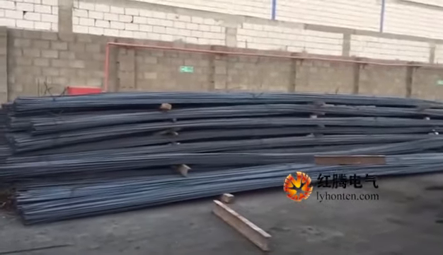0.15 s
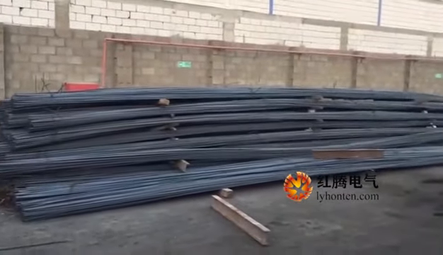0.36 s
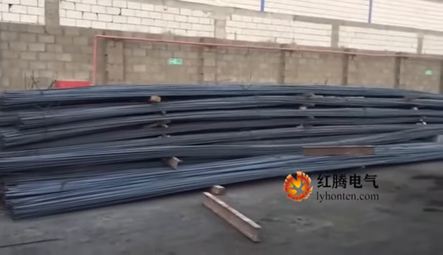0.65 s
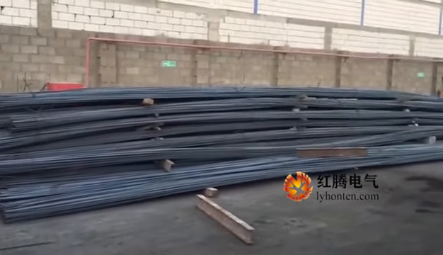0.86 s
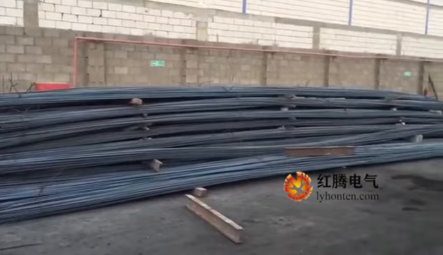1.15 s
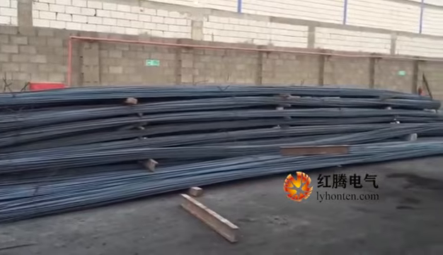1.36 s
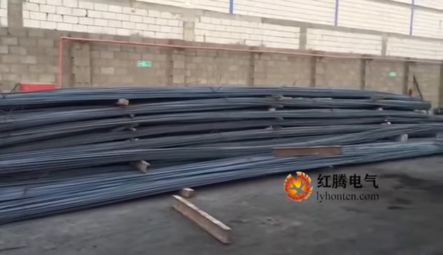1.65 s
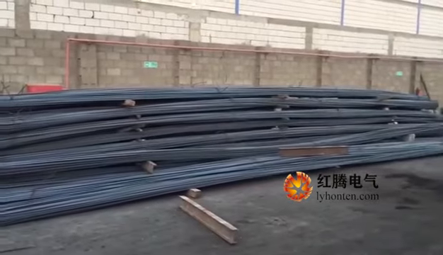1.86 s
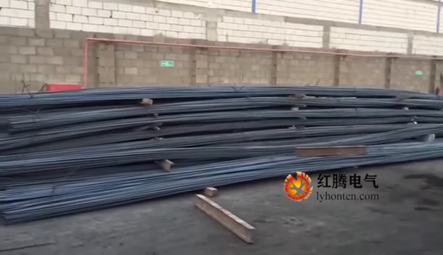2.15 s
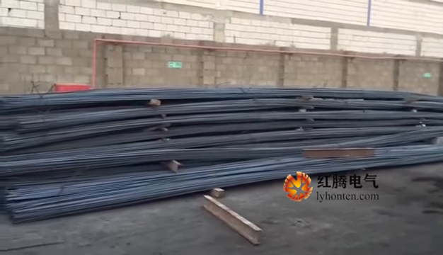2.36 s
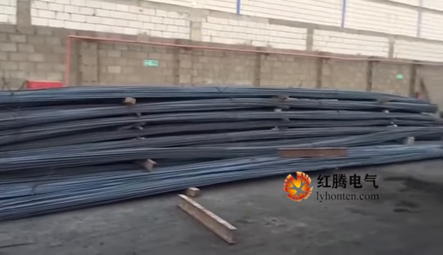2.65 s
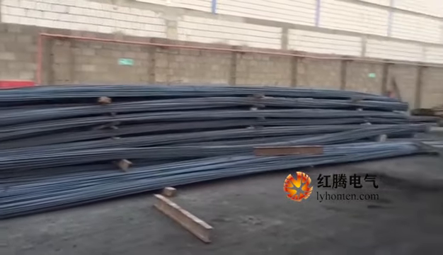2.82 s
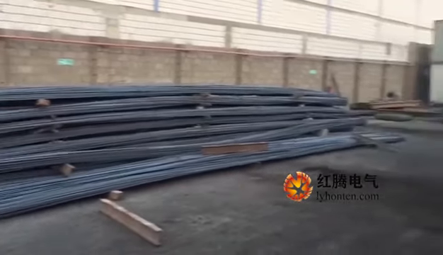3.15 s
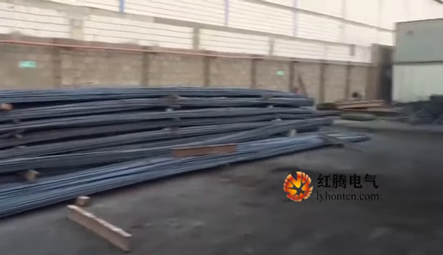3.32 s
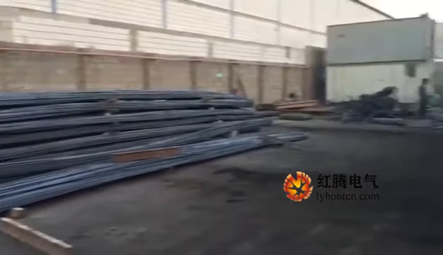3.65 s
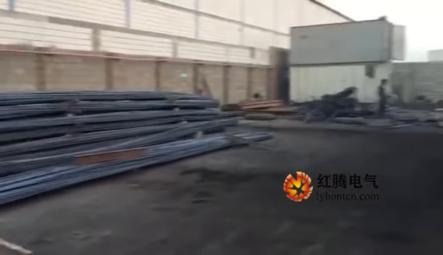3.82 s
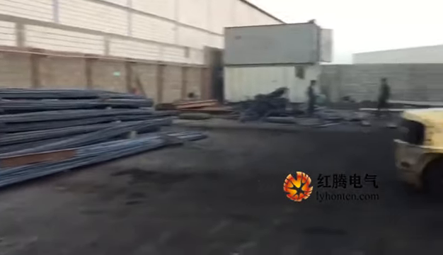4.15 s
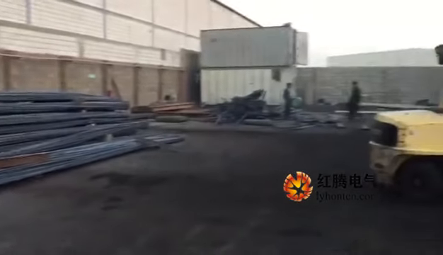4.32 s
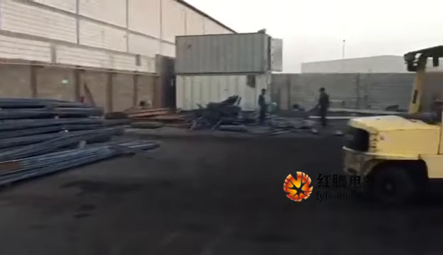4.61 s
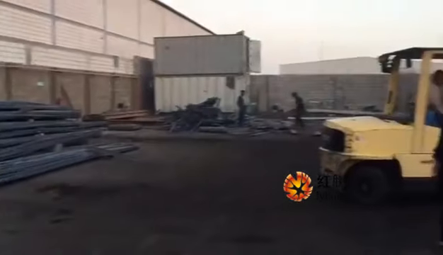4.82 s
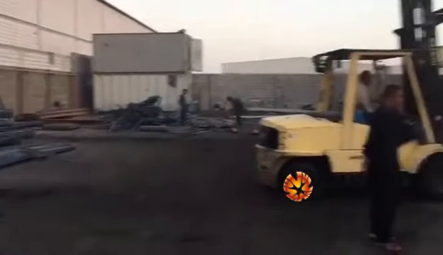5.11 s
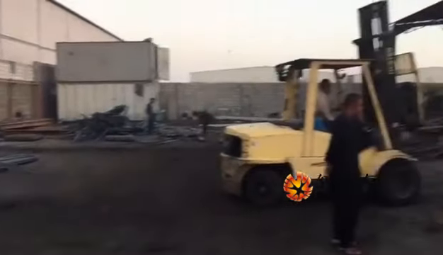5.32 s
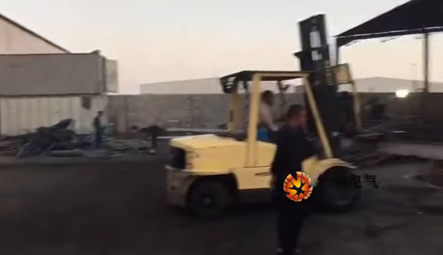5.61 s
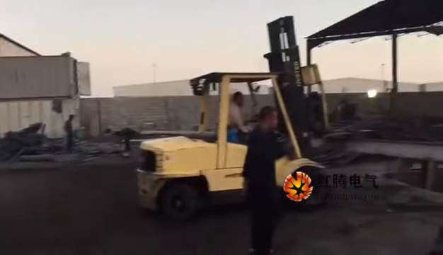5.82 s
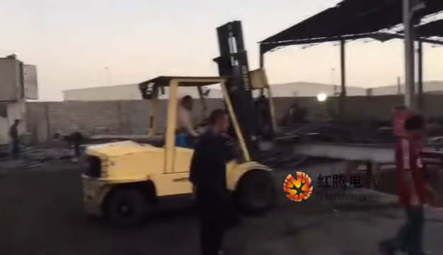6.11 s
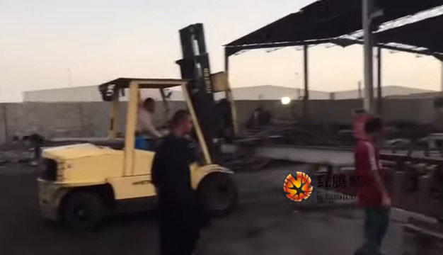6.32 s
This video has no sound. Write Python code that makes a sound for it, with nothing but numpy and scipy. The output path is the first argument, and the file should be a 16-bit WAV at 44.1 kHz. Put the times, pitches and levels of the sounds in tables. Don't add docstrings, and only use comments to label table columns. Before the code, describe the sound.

A loud diesel drone runs throughout, deep and steady, throbbing about thirteen times a second with a three-beat pulse, beneath a broad wash of rolls, fans and air. At 0.3-0.6 s rubbing steel gives a short hollow squeak and thin high squeals. A far motor hum climbs slowly from the start and is cut at 1.7 s. A brief bright jet passes at 1 s; a longer hissing rush swells from 1.7 to about 2.7 s, opening with a hard double clank of steel bars and a short yard echo. The forklift revs steeply from 1.8 s, loudest near 2.3 s, falls by 3.2 s, then revs lower and softer until about 5 s. A faint tick comes at 3.1 s, dull scraping and tiny squeaks at 4.3-5 s. From 5.7 s more thin squeaks sound as the handheld microphone turns, the wash growing fuller and the low drone thinning.

```python
import sys
import numpy as np
from scipy import signal
from scipy.fft import rfft, irfft
from scipy.io import wavfile
from scipy.ndimage import uniform_filter1d

SR = 44100
rng = np.random.default_rng(int(sys.argv[2]) if len(sys.argv) > 2 else 0)


def ratio_of_db(decibels):
    return 10 ** (np.asarray(decibels, float) / 20)


def digitize_waveform(pressure):
    field = np.atleast_2d(pressure).T
    bounded = np.clip(field, -1, 1)
    quanta = np.round(bounded * 32767).astype(np.int16)
    wavfile.write(sys.argv[1], SR, quanta)


N = 285327


def curves(table):
    s, *columns = np.transpose(table)
    return [np.interp(np.arange(N) / SR, s, column) for column in columns]


def walk(rate):
    hold = int(SR / rate)
    steps = np.repeat(rng.standard_normal(N // hold + 1), hold)
    return 1.36 * uniform_filter1d(uniform_filter1d(steps, hold), hold)[:N]


# time in seconds, turn from 0 to 1.
TURN = [(0, 0.06), (1, 0.06), (2, 0.05), (3, 0.18), (4, 0.35), (5, 0.41), (5.8, 0.69), (6.2, 0.98),
        (6.47, .9)]


def phone_turn():
    return curves(TURN)[0]


# start in seconds, hold in seconds, level in dB, brightness from 0 to 1.
RUSHES = [
    (-.2, 0.4, 1.5, 0.37),
    (1.0, .12, 1, .8),
    (1.66, 0.54, 5.5, .9),
    (3.3, .1, 1.4, .7),
    (4.3, .5, 1.5, 0.2),
]


def wash_change(turn):
    attack_s, release_s = .08, 0.41
    rest_db = np.array([0, -1.5, -1.28, -1.97])
    full_turn_db = np.array([0.54, 3, 3.84, 2.5])
    dull_share = np.array([.3, 1.2, .8, .3])
    bright_share = np.array([.1, .3, .33, 1.1])
    t = np.arange(N) / SR
    change = rest_db[:, None] + np.outer(full_turn_db, turn)
    for start, hold, db, bright in RUSHES:
        rise = (t - start) / attack_s
        fall = 1 - (t - start - attack_s - hold) / release_s
        swell = np.clip(np.minimum(rise, fall), 0, 1)
        share = (1 - bright) * dull_share + bright * bright_share
        change = change + db * np.outer(share, swell)
    return change


# frequency in Hz, level in dB per Hz.
WASH_COLOUR = [(12, -61), (29, -61), (42, -55.5), (62, -44.5), (105, -46), (140, -50), (190, -48), (270, -51),
               (450, -56), (640, -51), (760, -54.5), (950, -58.5),
               (1300, -59.5), (1900, -60), (2350, -64), (2770, -66.5), (3300, -67), (3750, -69), (4300, -71),
        (4880, -76), (5400, -75.5), (6200, -75.5), (7500, -81)]


def wash(cycle, lift_phase, turn):
    change = wash_change(turn)
    colour_hz, colour_db = np.transpose(WASH_COLOUR)
    hz = np.maximum(np.fft.rfftfreq(N, 1 / SR), 1)
    colour = ratio_of_db(np.interp(np.log(hz), np.log(colour_hz), colour_db)) * np.sqrt(SR / 2)
    breath_db = .55 * np.cos(2 * np.pi * (cycle - .55)) + 0.25 * np.cos(6 * np.pi * cycle)
    breath_db += 0.34 * np.cos(lift_phase)
    shared_db = 0.33 * walk(9)
    out = np.zeros(N)
    for octave in np.arange(-6.5, 3.5, .5):
        shape = np.cos(np.pi * np.clip(np.log2(hz / 1000) - octave, -.5, .5))
        place = np.interp(octave, [-2.5, -1.5, -.5, .5, 1.5, 2.5], [0, 1, 1, 2, 2, 3])
        lower = min(int(place), 2)
        layer_db = change[lower] + (place - lower) * (change[lower + 1] - change[lower])
        flicker_db = shared_db + .6 * walk(9) + .6 * walk(25)
        band = irfft(rfft(rng.standard_normal(N)) * colour * shape, N)
        out += ratio_of_db(layer_db + breath_db + flicker_db) * band
    return out


def motor():
    start_hz, climb_hz_per_s = 50.4, 3.5
    start_db, rise_db_per_s = -37, 4.0
    cut_s, fade_s = 1.7, .08
    t = np.arange(N) / SR
    phase = 2 * np.pi * (start_hz * t + climb_hz_per_s * t ** 2 / 2)
    fade = np.clip(1 - (t - cut_s) / fade_s, 0, 1)
    level = ratio_of_db(start_db + rise_db_per_s * t + walk(6)) * fade
    return np.sqrt(2) * level * (np.sin(phase) + ratio_of_db(-10.5) * np.sin(2 * phase))


# start in seconds, end
# in seconds, pitch in Hz, level in dB, wobble in Hz.
SQUEAKS = [(0.27, 0.46, 3238, -40, 12), (0.46, .58, 3200, -44, 40), (.295, .37, 640, -23.5, 4),
           (0.4, .45, 1240, -35, 7.4), (.27, .36, 1980, -34, 30), (4.92, 5.04, 4530, -48, 30),
           (4.36, 4.41, 4440, -39, 10), (4.365, 4.41, 4540, -43, 30), (4.37, 4.412, 4850, -36.5, 12),
           (5.74, 5.83, 4455, -47, 25), (5.86, 5.9, 4535, -44, 25), (5.88, 5.93, 4455, -44, 10),
           (5.93, 5.99, 4525, -43, 15), (5.98, 6.09, 4455, -44, 10), (6.09, 6.13, 4540, -44, 10),
           (6.0, 6.11, 668, -30, 7.3), (6, 6.47, 685, -30, 6), (-0.5, 5.7, 2395, -50, 3),
           (2.72, 2.92, 57.5, -25, .6), (1.7, 1.8, 88, -26, 1.8), (1.83, 2.1, 326, -28, 2),
           (5.5, 5.6, 72, -27, 1.5)]


def squeaks():
    out, t = np.zeros(N), np.arange(N) / SR
    for start, end, hz, db, wobble_hz in SQUEAKS:
        swell = np.sin(np.pi * np.clip((t - start) / (end - start), 0, 1))
        level = ratio_of_db(db + 1.7 * walk(30)) * swell
        phase = 2 * np.pi * np.cumsum(hz + wobble_hz * walk(20)) / SR
        out += level * np.sin(phase)
    return np.sqrt(2) * out


# start in seconds, blow in dB, crack in dB, then the modes,
# each with its frequency in Hz, level in dB, 60 dB decay time in seconds.
CLANKS = [
    (1.668, -16, 14, [(624, -3, .05), (830, -2, .05), (996, 1.5, 0.064), (1230, -6, .05), (1456, -3, 0.065), (2156, -1, .07), (2800, -2, .03), (3180, 0.5, 0.036), (3550, -4, .03), (6360, -18, 0.089)]),
    (1.670, -27, -20, [(6362, 0, .2), (6430, -6, .1)]),
    (1.676, -16.5, 10, [(1550, 0.5, .06), (1766, -5, 0.054), (1990, -0.5, .05), (2310, -2, 0.055), (3970, -3, 0.059)]),
    (3.145, -37, 0, [(4530, 1, .15), (5100, 0, .08)]),
    (1.83, -22, -20, [(860, -4.5, 0.33), (1090, -6, .3)]),
]


def clanks():
    yard_t60_s, yard_db = 0.61, -9
    out, t = np.zeros(N), np.arange(SR) / SR
    crack_filter = signal.butter(3, 2900, fs=SR, output="sos")
    for start, blow_db, crack_db, modes in CLANKS:
        ring = sum(ratio_of_db(db) * np.sin(2 * np.pi * hz * t) * 1000. ** (-t / t60) for hz, db, t60 in modes)
        ring = ring * (1 - np.exp(-t / 0.00055))
        crack = np.diff(rng.standard_normal(SR + 1)) * np.exp(-(t / 0.012) ** 2)
        crack = signal.sosfilt(crack_filter, crack)
        hit = ratio_of_db(blow_db) * (ring + ratio_of_db(crack_db) * crack)
        i = int(start * SR)
        out[i:i + SR] += hit[:N - i]
    dull_noise = signal.lfilter([1], [1, -.8], rng.standard_normal(SR))
    tail = dull_noise * 1000. ** (-t / yard_t60_s) * (t > .03)
    tail /= np.sqrt(np.sum(tail ** 2))
    return out + ratio_of_db(yard_db) * signal.fftconvolve(out, tail)[:N]


# time in seconds, firing rate in Hz, firing tone in dB.
LIFT = [(1.75, 40, -44.5), (1.9, 41.23, -30), (2.05, 48.32, -22), (2.2, 55.8, -15), (2.3, 58.97, -14),
        (2.4, 62.28, -18.5), (2.55, 64.48, -25), (2.7, 62.46, -28), (2.8, 58.96, -23), (3.05, 43.48, -30),
        (3.25, 38, -42), (3.4, 41.5, -30), (3.6, 45.73, -28), (3.9, 47.66, -27.5), (4.75, 44.56, -29),
        (5, 40.8, -35), (5.9, 39.9, -36), (6.1, 40, -48)]
# level in dB at middle effort, share of the firing tone's change that it follows.
OVERTONES = [(-37, .5), (-43, .15), (-42, 0.21)]
# centre in Hz, width in Hz, lift in dB.
BOX = [(139, 8, 7), (177, 17, 11.5)]


def forklift():
    middle_effort_db = -30
    hz, tone_db = curves(LIFT)
    phase = 2 * np.pi * np.cumsum(hz) / SR
    tones = ratio_of_db(tone_db + walk(6)) * np.sin(phase)
    for k, (db, share) in enumerate(OVERTONES, 2):
        box_db = sum(lift_db / (1 + ((k * hz - centre) / width) ** 2) for centre, width, lift_db in BOX)
        effort_db = share * (tone_db - middle_effort_db)
        tones += ratio_of_db(db + effort_db + box_db + walk(6)) * np.sin(k * phase + k)
    return np.sqrt(2) * tones, phase


# time in seconds, cycle rate in Hz.
CYCLE = [(0, 13.442), (.92, 13.406), (1.85, 13.392), (2.77, 13.385), (3.7, 13.411), (4.62, 13.419),
         (5.55, 13.437), (6.47, 13.477)]


def diesel_cycle():
    return np.cumsum(curves(CYCLE)[0]) / SR


# multiple of
# the cycle, level in dB rms.
ORDER = [(5, -50.5), (6, -17.5), (7, -23), (8, -34), (9, -23.5), (10, -48), (11, -42), (12, -28), (13, -34),
         (14, -45), (15, -23), (16, -28.5), (17, -29), (18, -42.5), (19, -34.5), (20, -45), (21, -42),
         (22, -40.5), (23, -42.5), (24, -46.5), (26, -43.5),
         (32, -41.5), (34, -44), (35, -43.5), (37, -43), (41, -47.5), (43, -47.5), (44, -46), (46, -44),
         (47, -42), (49, -43.5), (53, -45.5), (55, -40), (74, -47), (111, -50)]


def diesel(cycle, turn):
    rest_db = (1, -2, -0.15)
    turn_db = [-4.5 * np.clip(turn, 0, 2) ** 3.2, 8 * turn, 0.25 * turn]
    start, slope, bend = 3.975, -.2096, .1095
    uneven = [(0, -.62, .85), (0, -1.45, -2.8)]
    out = np.zeros(N)
    for k, db in ORDER:
        k = int(round(k))
        pipe = start + slope * k + bend * k ** 2
        phase = 2 * np.pi * k * cycle + pipe + uneven[k > 13][k % 3]
        group = (k > 9) + (k > 14)
        level = ratio_of_db(db + rest_db[group] + turn_db[group] + .8 * walk(4))
        out += level * np.cos(phase + .12 * walk(5))
    return np.sqrt(2) * out


def scene():
    cycle, turn = diesel_cycle(), phone_turn()
    lift, lift_phase = forklift()
    background = wash(cycle, lift_phase, turn) + motor()
    steel = squeaks() + clanks()
    return (background + steel + lift + diesel(cycle, turn))[None]


def band_limit(x):
    return signal.sosfilt(signal.butter(12, 7820, fs=SR, output="sos"), x)


def record(dry):
    rounded = np.tanh(0.81 * dry) / 0.79
    top_cut = signal.ellip(16, .3, 70, 7495, fs=SR, output="sos")
    return band_limit(signal.sosfilt(top_cut, rounded))


dry = scene()
out = record(dry)
digitize_waveform(out)
```